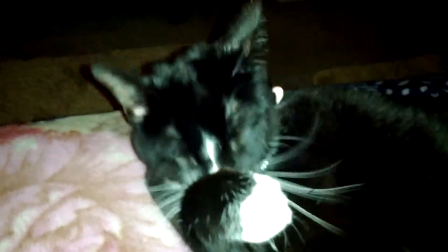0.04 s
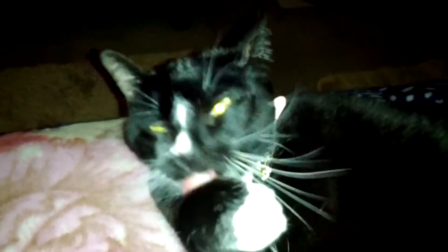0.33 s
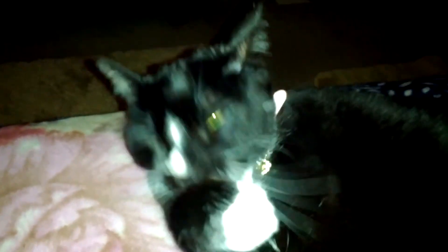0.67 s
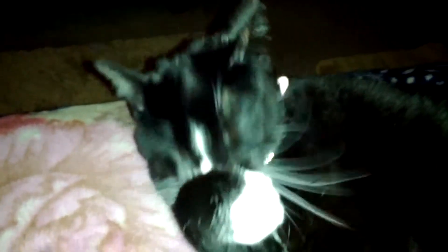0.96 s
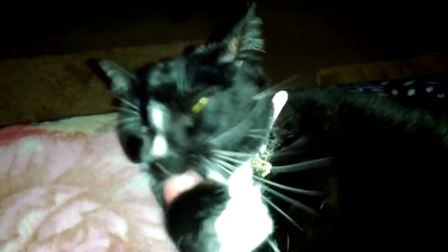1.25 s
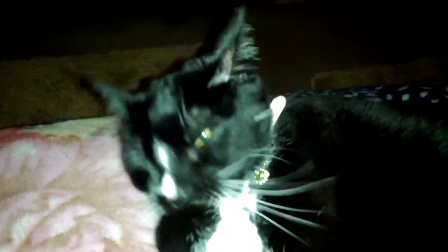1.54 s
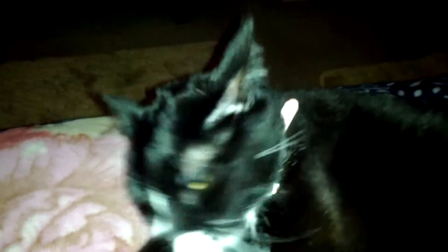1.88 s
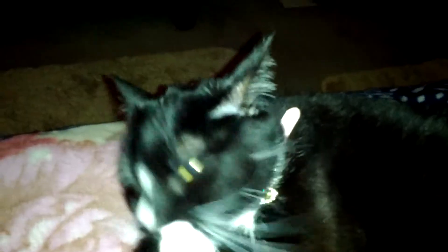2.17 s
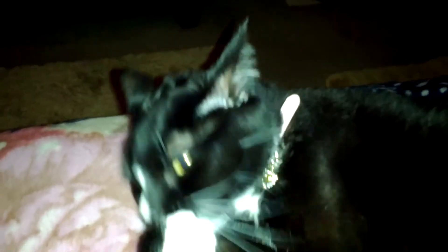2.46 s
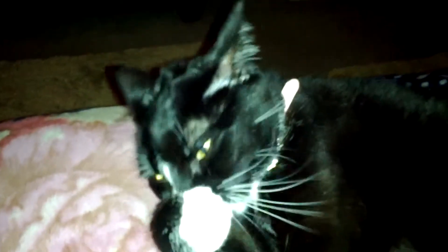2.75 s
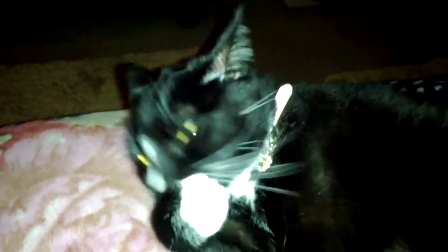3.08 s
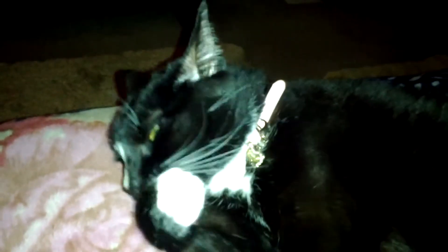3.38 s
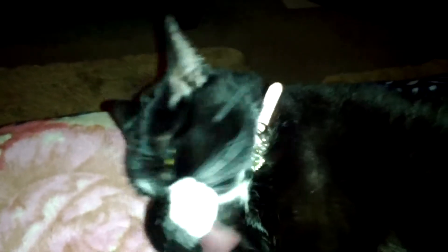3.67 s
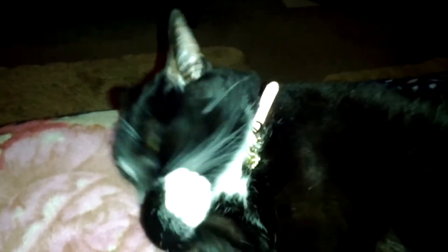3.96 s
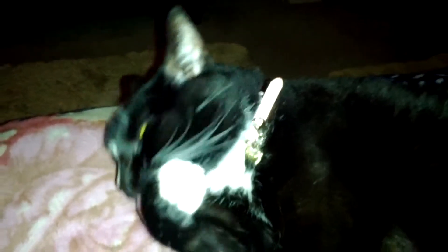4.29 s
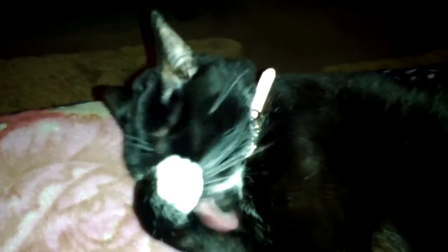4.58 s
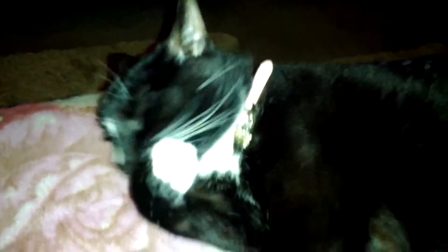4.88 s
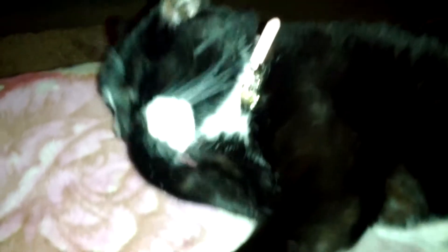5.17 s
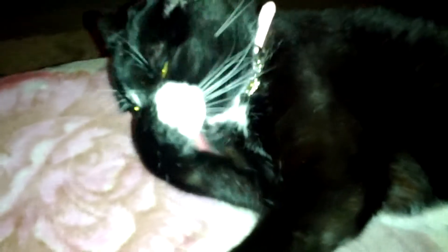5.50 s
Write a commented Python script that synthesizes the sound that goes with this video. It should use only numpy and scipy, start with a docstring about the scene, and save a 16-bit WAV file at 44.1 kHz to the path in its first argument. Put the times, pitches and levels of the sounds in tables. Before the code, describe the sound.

A cat licks its paw with faint wet ticks over quiet room hiss, interrupted early by loud rubbing and knocks on the microphone.

```python
"""A quiet room, where a cat licks its paw with faint wet ticks of tongue and lips.
Up close and much louder, a hand shifts on the camera: skin drags and catches on the case,
knocks near the microphone, then settles with soft bumps.
Under it all lies a bed of room hiss, mains hum and thin electronic whine."""
import sys
import numpy as np
from scipy import signal
from scipy.fft import rfft, irfft, next_fast_len
from scipy.io import wavfile
from scipy.ndimage import map_coordinates

SR = 44100
rng = np.random.default_rng(int(sys.argv[2]) if len(sys.argv) > 2 else 0)


def master_out(mix):
    """Clip the mix to full scale and print it as 16-bit PCM to the path in sys.argv[1]."""
    frames = np.transpose(np.atleast_2d(mix))
    ceiling = np.clip(frames, -1, 1)
    pcm = np.round(ceiling * 32767).astype(np.int16)
    wavfile.write(sys.argv[1], SR, pcm)


N = 244314
TIME = np.arange(N) / SR
SHORT = np.arange(SR // 16) / SR  # time axis of a one-shot


# tongue strokes: centre t/s, level/dB, half width/s
LICKS = [(3.175, -66.5, 0.02), (3.575, -68, 0.014), (4.04, -68, 0.013), (4.518, -65, .014),
         (4.972, -65, 0.0081)]
# tone of tongue on fur: f/Hz, level/dB
FUR_EQ = [(3000, -30), (4500, -8), (5200, 0), (6200, -2), (9000, -14), (15000, -24)]
# round, wet mouth pops: t/s, level/dB, f/Hz, t60/s
POPS = [(.5375, -40, 5100, 0.0044), (.5510, -32.5, 5000, 0.01), (2.6327, -34, 5100, 0.0051),
        (3.34, -44.5, 7900, 0.0054), (3.5847, -47, 5400, .005), (4.038, -52, 5200, .005)]
# the tongue peels off the fur: t/s, level/dB
SMACKS = [(2.3489, -30.5), (3.3405, -39), (3.6285, -43.5), (4.882, -30)]
# mouth resonances: f/Hz, level/dB, t60/s
MOUTH_MODES = [(5200, -2, 0.003), (7030, 2, 0.0031), (10700, -1, 0.0031), (13800, -4, .002)]

def licking(attack_s=0.00036, grit_db=3):
    """The tongue rasps, saliva bubbles ring at one pitch, a parting wet film clicks the mouth's modes."""
    grit = amp(grit_db * wobble(500))
    out = swells(LICKS) * unit(grit * noise(lambda hz: gains(FUR_EQ, hz)))
    for s, db, hz, t60 in POPS:
        onset = 1 - np.exp(-SHORT / attack_s)
        add(out, s, amp(db) * crest(onset * ping(hz, t60)))
    for s, db in SMACKS:
        add(out, s, amp(db) * ring(MOUTH_MODES, scatter_db=1.5))
    return out


# envelope of the hand's drag: t/s, level/dB
DRAG_ENVELOPE = [(0.46, -70), (0.54, -51.5), (0.57, -66), (0.59, -57), (0.66, -62), (0.74, -46.5),
                 (0.838, -47), (0.89, -39.5), (0.945, -50.5)]
# tone of skin rasping on the case: f/Hz, level/dB
SKIN_EQ = [(180, -37), (300, -1), (440, -8), (486, 0.5), (565, -22), (930, -1.5), (2360, -7.5), (2700, 4),
           (2930, -20), (3240, -0.5), (8500, -6.5), (13300, -31), (16000, -41)]
# featured snags, loudest as the skin lets go: t/s, level/dB
SNAGS = [(0.5889, -28), (0.7334, -21), (0.8549, -26), (0.863, -22), (0.8829, -18.5), (0.923, -20.5),
         (0.9503, -23), (0.9822, -19), (0.9874, -1.5), (0.9904, 2), (0.9972, -12)]
# tone of a snag's release: f/Hz, level/dB
SNAP_EQ = [(150, -32), (700, -3.5), (1700, -4), (2900, 2.5), (4800, -8), (7000, -5), (10000, -6),
           (13500, -6), (16500, -17)]

def drag(slips_per_s=1500, spread_db=18.0, grain_db=-1, rasp_db=-5.0, fade_s=0.072):
    """Stick and slip: a grain of tiny slips over a smooth rasp, with big snags that chatter briefly."""
    times, dbs = np.transpose(DRAG_ENVELOPE)
    outside_s = np.maximum(times[0] - TIME, 0) + np.maximum(TIME - times[-1], 0)
    envelope = amp(np.interp(TIME, times, dbs)) * np.exp(-outside_s / fade_s)
    slips = (rng.random(N) < slips_per_s / SR) * rng.choice([-1, 1], N)
    strength = amp(spread_db * np.minimum(rng.exponential(size=N), 3))
    grains = unit(signal.fftconvolve(slips * strength, impulse(SKIN_EQ))[:N])
    snags, snap = np.zeros(N), impulse(SNAP_EQ)
    for s, db in [*SNAGS, *catches(envelope)]:
        add(snags, s, rng.choice([-1, 1]) * amp(db) * contact(snap, chatter=0.17, decay_s=0.00083))
    rasp = noise(lambda hz: gains(SKIN_EQ, hz))
    return snags + envelope * (amp(grain_db) * grains + amp(rasp_db) * rasp)


def catches(envelope, start_s=0.52, end_s=0.985, gap_s=0.007, over_db=12.5, grip_db_per_s=11):
    """Skin catches at an uneven pace, harder the harder and longer it drags: rows of t/s, level/dB."""
    jitter, scatter_db = rng.standard_normal((200, 2)).T
    held_s = np.cumsum(gap_s * np.exp(0.45 * jitter))
    times = start_s + held_s
    drag_db = 20 * np.log10(np.interp(times, TIME, envelope))
    dbs = drag_db + over_db + grip_db_per_s * held_s + scatter_db
    return [(s, db) for s, db in zip(times, dbs) if s < end_s]


# finger hits on the case: t/s, level/dB, tilt/(dB per octave), crack level/dB
KNOCKS = [(0.9879, -7.5, -0.5, -6), (0.99, -7, 0.5, -50), (0.9978, 0, 1, -17.5),
          (1.1508, -15.5, 0.5, -32.5), (1.3403, -38, -2, -28), (1.401, -27, -6, -27),
          (1.4185, -23, -2, -22), (1.6645, -18.5, 3, -16.5), (1.6694, 3.5, -0.03, -20.5)]
# the case's hollow body and short ring: f/Hz, level/dB
CASE_EQ = [(30, -9), (110, -3.5), (220, -2.5), (340, -1), (600, -7), (1000, -11.5), (1400, -24),
           (2000, -20), (2900, -18.5), (4300, -21), (5700, -15), (7600, -10.5), (11000, -24), (15000, -22)]
# tone of the shell flexing: f/Hz, level/dB
CRACK_EQ = [(150, 2), (600, 2.5), (1050, 2), (1550, -0.5), (2600, -5), (3200, -5.5), (4300, -15.5),
            (8000, -20), (16000, -35)]

def knocks(chatter=0.062, decay_s=0.0023):
    """Each hit sounds the same case: a nail is bright, a fingertip dull, a squeeze cracks the shell."""
    out, crack = np.zeros(N), impulse(CRACK_EQ)
    for s, db, tilt, crack_db in KNOCKS:
        body = impulse([(hz, level + tilt * np.log2(hz)) for hz, level in CASE_EQ])
        add(out, s, -amp(db) * contact(body, chatter, decay_s))
        add(out, s, -amp(crack_db) * contact(crack, chatter, decay_s))
    return out


# dull thumps of the flexing grip: t/s, level/dB, f/Hz, bumps in the run
BUMPS = [(0.9876, -29.5, 116, 1), (1.354, -32, 101, 1), (1.3995, -24.5, 101, 1), (1.56, -37.5, 109, 1),
         (1.6658, -20, 146, 1), (1.787, -37, 200, 8), (2.200, -38.5, 183, 1), (2.428, -37, 179, 1),
         (2.579, -38, 179, 1), (2.6478, -36.5, 180, 1), (4.946, -33, 175, 1), (5.328, -40.5, 180, 4)]

def bumps(rise_cycles=0.55, creep_s=0.0355, jitter_s=0.0025, scatter_db=0.5, relax_db=5):
    """A soft push rocks the case for about a cycle; a creeping grip repeats it, the last time softer."""
    out = np.zeros(N)
    for s, db, hz, count in BUMPS:
        rise = SHORT * hz / rise_cycles
        envelope = (rise * np.exp(1 - rise)) ** 3
        push = -crest(envelope * np.sin(2 * np.pi * hz * SHORT))
        add(out, s, amp(db) * push)
        for k in range(1, round(count)):
            late, stronger = rng.standard_normal(2)
            change_db = scatter_db * stronger - relax_db * (k == round(count) - 1)
            add(out, s + k * creep_s + jitter_s * late, amp(db + change_db) * push)
    return out


# light wipes of skin: centre t/s, level/dB, half width/s
BRUSHES = [(.9963, -27, 0.00099), (1.207, -57, 0.068), (1.36, -43, 0.0075), (1.465, -52.5, 0.039),
           (1.535, -51.5, 0.0082), (1.569, -50.5, 0.0065), (1.698, -46, 0.014)]
# tone of a wipe: f/Hz, level/dB
BRUSH_EQ = [(120, -43), (200, 4), (722, -6.5), (1320, -7.5), (2910, -9), (4120, -9.5), (7010, -11),
            (11900, -17.5), (16000, -30)]

def brushes(flutter_db=2, rub_db=-44, rub_s=0.02):
    """Skin wipes over the case in soft swells, and a finger slides off as a tail to each knock."""
    rubs = sum(amp(db + rub_db) * (TIME > s) * np.exp(-np.abs(TIME - s) / rub_s) for s, db, *_ in KNOCKS)
    flutter = amp(flutter_db * wobble(400))
    return (swells(BRUSHES) + rubs) * flutter * noise(lambda hz: gains(BRUSH_EQ, hz))


# dark wash of room air: f/Hz, level/dB
AIR_EQ = [(10, 0.5), (45, -9.5), (85, 0.5), (195, -1), (290, -7), (620, -12.5), (820, -14), (1150, -15),
          (1900, -19), (2400, -18), (3100, -23.5), (3800, -30.5), (8000, -56)]
# resonances that colour the air: f/Hz, level/dB, half width/Hz
RESONANCES = [(31, -67.5, 11), (223, -65.5, 13.6), (338, -74.5, 4.2), (411.4, -74.5, 14), (491, -72.5, 11),
              (557.5, -68.5, 32), (726, -67.5, 57), (877, -71.5, 57), (1066, -91, 13), (1615, -73.5, 96)]
# tone of the microphone hiss: f/Hz, level/dB
HISS_EQ = [(2500, -27), (4100, -8), (5000, -0.5), (5900, -2), (7100, 4), (8000, 0), (8600, 0.5), (9800, -4),
           (13500, -4.5), (15700, -7)]
# mains hum tones: f/Hz, level/dB
HUM = [(59.2, -61), (118.4, -59), (172.3, -64)]

def room_tone(air_db=-55.0, hiss_db=-63.5, top_hz=15850, waver_rad=0.21):
    """The bed: steady air with its resonances, microphone hiss and a wavering mains hum."""
    air = amp(air_db) * noise(lambda hz: gains(AIR_EQ, hz) * (hz < top_hz))
    colour = sum(amp(db) * band(hz, width) for hz, db, width in RESONANCES)
    hiss = amp(hiss_db) * noise(lambda hz: gains(HISS_EQ, hz) * (hz < top_hz))
    hum = sum(amp(db) * unit(np.sin(2 * np.pi * hz * TIME + waver_rad * wobble(5.33))) for hz, db in HUM)
    return air + colour + hiss + hum


# steady electronic tones: f/Hz, level/dB, half width/Hz
WHINE = [(3590, -87.5, 9.4), (7600, -85.5, 43), (7240, -71.5, 11), (15230, -89, 72)]

def whine(sizzle_hz=7410, sizzle_db=-70.5, pulse_hz=8.32):
    """Thin, fuzzy electronic tones; beside the strongest, a narrow sizzle pulses."""
    steady = sum(amp(db) * band(hz, width) for hz, db, width in WHINE)
    cycle = np.cos(2 * np.pi * pulse_hz * (TIME - .073))
    pulse = unit((1 + cycle) ** 1.3)
    fade_up_db = np.interp(TIME, [1.7, 2.3], [-7, 0])
    return steady + amp(sizzle_db + fade_up_db) * pulse * band(sizzle_hz, half_width_hz=60)


def amp(db):
    """Decibels to gain."""
    return 10 ** (np.asarray(db) / 20)


def unit(x):
    """Normalise to rms 1."""
    return x / np.sqrt(np.mean(x ** 2) + 1e-20)


def crest(x):
    """Normalise to peak 1."""
    return x / np.abs(x).max()


def gains(eq, hz):
    """Gain of an EQ curve, read on a log frequency axis."""
    f, db = np.transpose(eq)
    return amp(np.interp(np.log(hz + 1), np.log(f + 1), db))


def filtered(x, response):
    """Run x through a frequency response."""
    size = next_fast_len(N + SR // 4)
    return irfft(rfft(x, size) * response(np.fft.rfftfreq(size, 1 / SR)), size)[:N]


def noise(response):
    """Coloured noise of rms 1."""
    return unit(filtered(rng.standard_normal(N), response))


def band(centre_hz, half_width_hz):
    """Narrow noise of rms 1."""
    return noise(lambda hz: 1 / (1 + ((hz - centre_hz) / half_width_hz) ** 2))


def wobble(rate):
    """A smooth random modulator, rate knots a second."""
    return map_coordinates(rng.standard_normal(int(N * rate / SR) + 4), [TIME * rate])


def swells(rows):
    """An envelope of bell-shaped swells."""
    return sum(amp(db) * np.exp(-.5 * ((TIME - s) / half_width) ** 2) for s, db, half_width in rows)


def impulse(eq, size=1024):
    """A minimum-phase transient of peak 1 with the tone of this EQ."""
    spectrum = np.maximum(gains(eq, np.fft.rfftfreq(size, 1 / SR)), 1e-6)
    cepstrum = irfft(np.log(spectrum))
    cepstrum[1:size // 2] *= 2
    cepstrum[size // 2 + 1:] = 0
    return crest(irfft(np.exp(rfft(cepstrum))))


def contact(pulse, chatter, decay_s):
    """One hit with a dying chatter of weaker ones."""
    force = chatter * rng.standard_normal(len(SHORT)) * np.exp(-SHORT / decay_s)
    force[0] = 1
    return signal.fftconvolve(force, pulse)


def ping(hz, t60):
    """A sine that dies by 60 dB in t60 seconds."""
    return np.exp(-np.log(1000) * SHORT / t60) * np.sin(2 * np.pi * hz * SHORT)


def ring(modes, scatter_db):
    """A click of peak 1: damped modes of alternating polarity, struck at new strengths each time."""
    return crest(sum((-1) ** k * amp(db + scatter_db * rng.standard_normal()) * ping(hz, t60)
                     for k, (hz, db, t60) in enumerate(modes)))


def add(track, s, sound):
    """Drop a sound onto the track at time s."""
    part = track[round(s * SR):][:len(sound)]
    part += sound[:len(part)]


def scene():
    """Mono mix: handling right at the microphone, the cat close by, the room behind."""
    handling = drag() + brushes() + knocks() + bumps()
    return (handling + licking() + room_tone() + whine())[None]


def record(dry):
    """The hardest hits overload the microphone; a steep low-pass trims the very top."""
    ceiling, top_hz = 0.72, 16500
    clipped = dry / (1 + np.abs(dry / ceiling) ** 6) ** (1 / 6)
    return np.array([filtered(channel, lambda hz: 1 / np.sqrt(1 + (hz / top_hz) ** 160))
                     for channel in clipped])


dry = scene()
out = record(dry)
master_out(out)
```